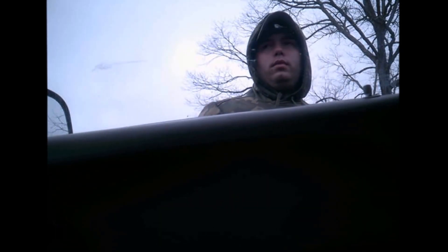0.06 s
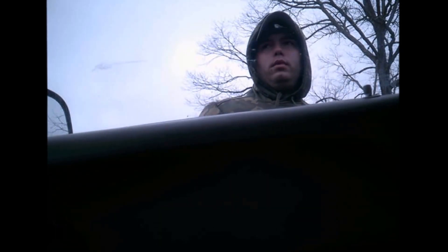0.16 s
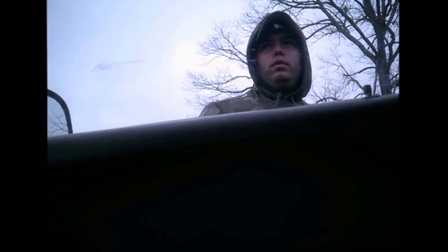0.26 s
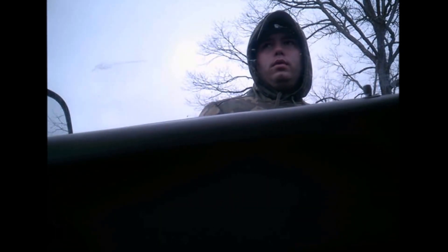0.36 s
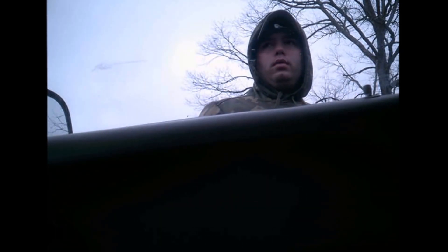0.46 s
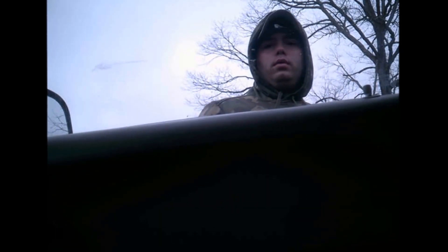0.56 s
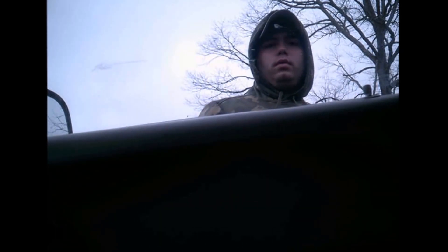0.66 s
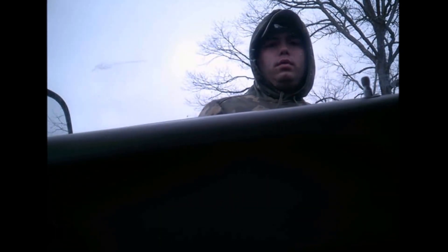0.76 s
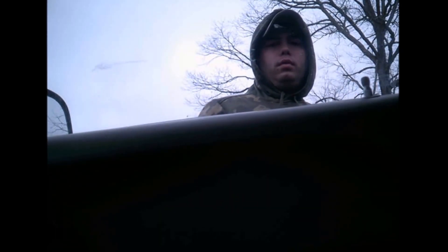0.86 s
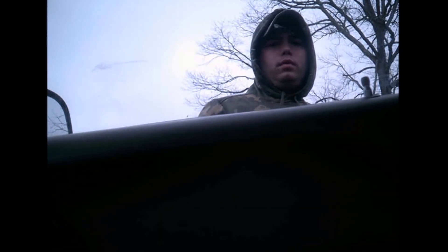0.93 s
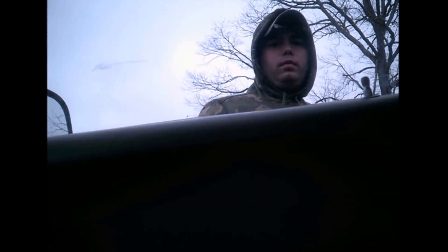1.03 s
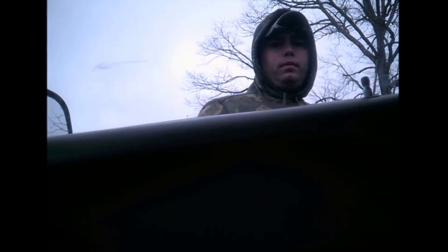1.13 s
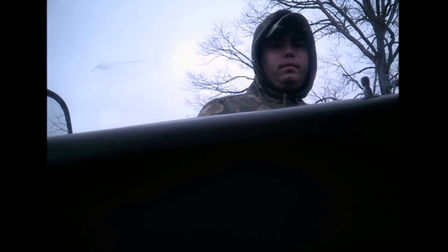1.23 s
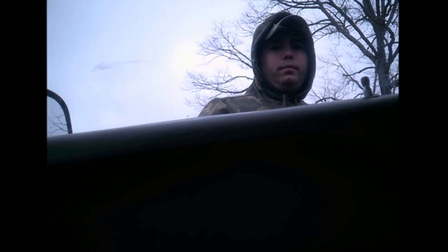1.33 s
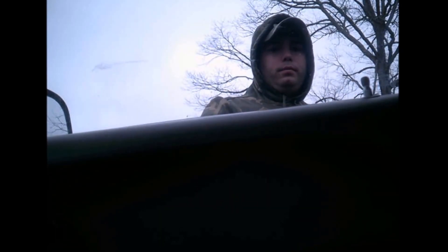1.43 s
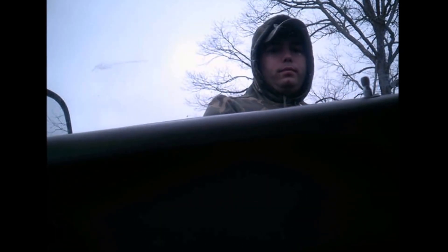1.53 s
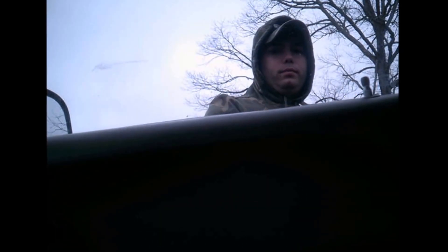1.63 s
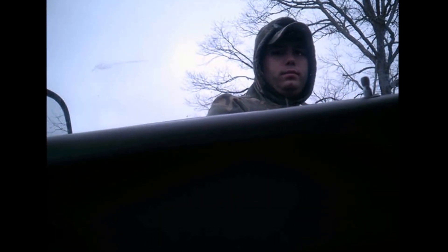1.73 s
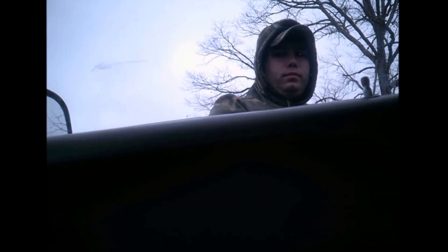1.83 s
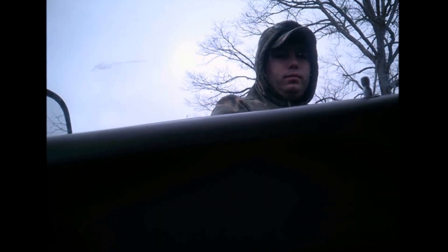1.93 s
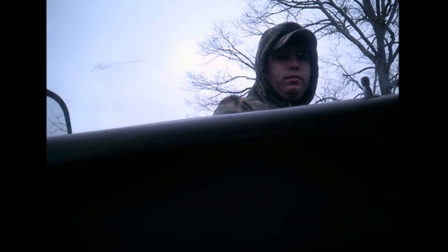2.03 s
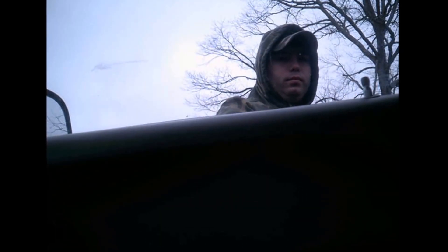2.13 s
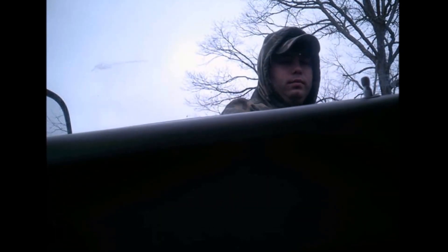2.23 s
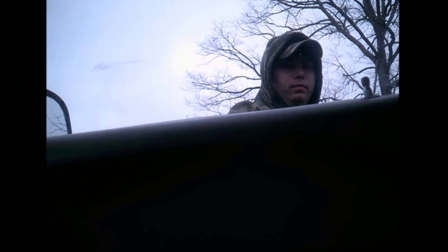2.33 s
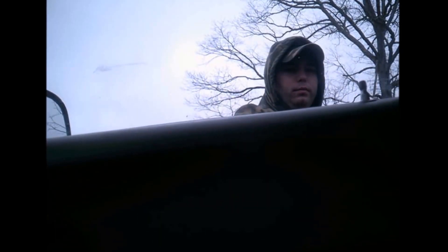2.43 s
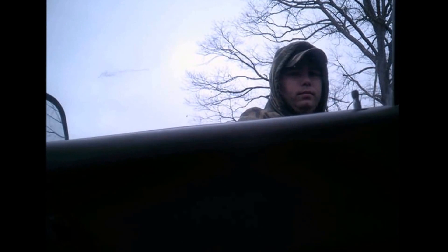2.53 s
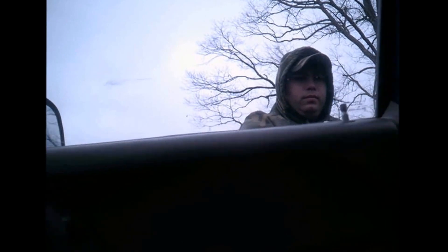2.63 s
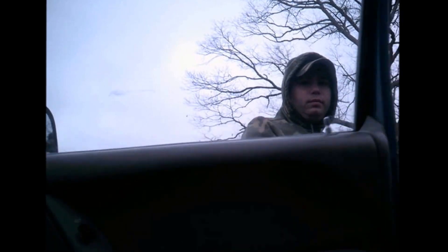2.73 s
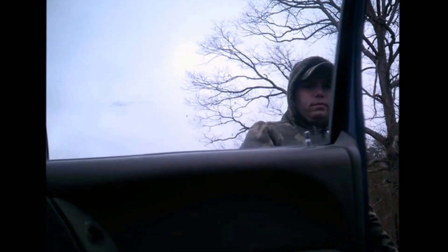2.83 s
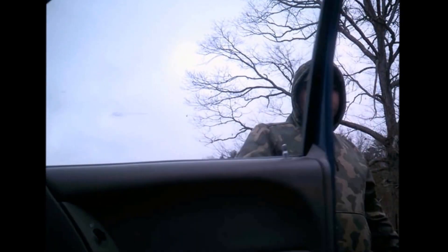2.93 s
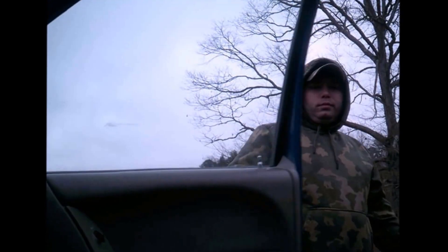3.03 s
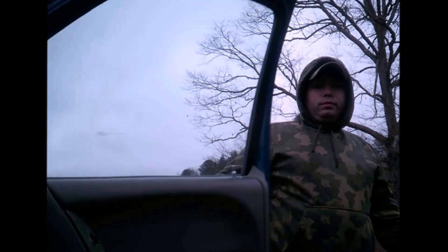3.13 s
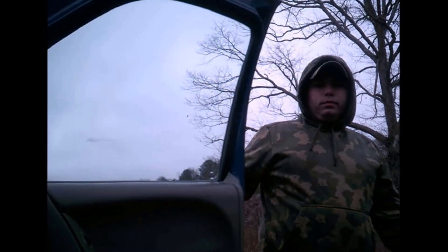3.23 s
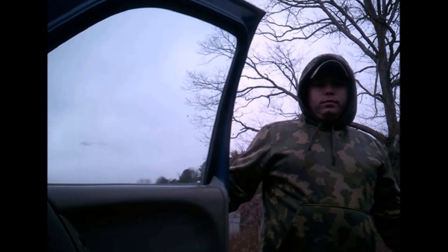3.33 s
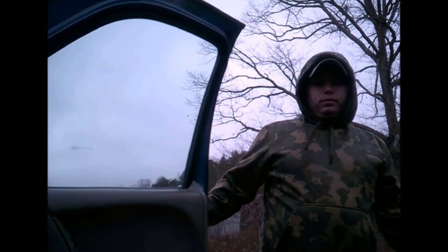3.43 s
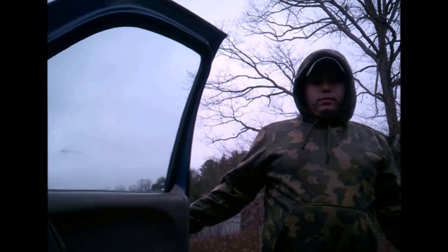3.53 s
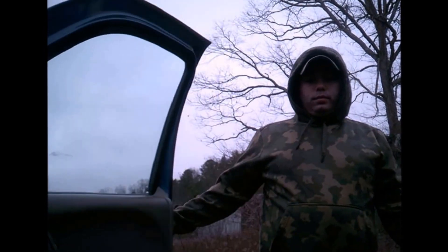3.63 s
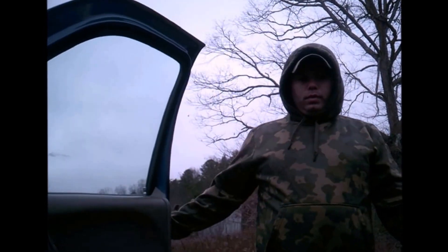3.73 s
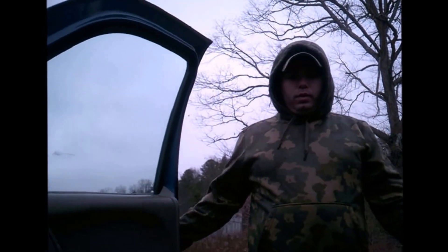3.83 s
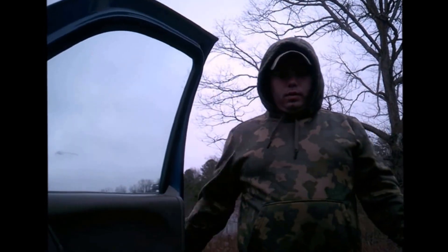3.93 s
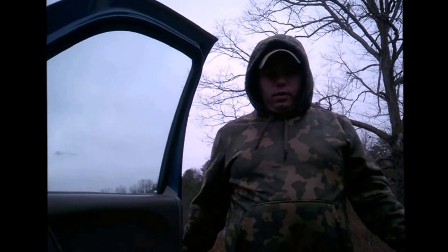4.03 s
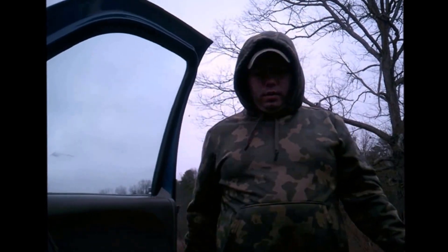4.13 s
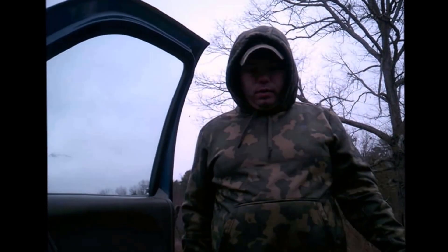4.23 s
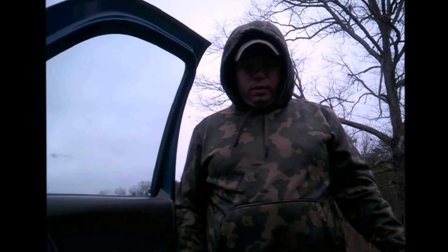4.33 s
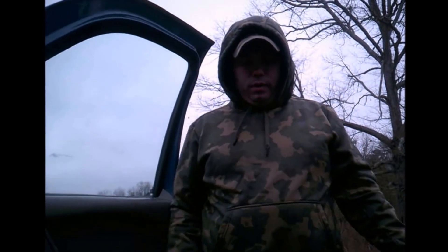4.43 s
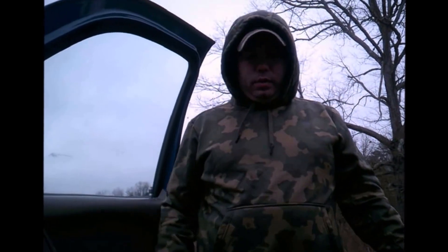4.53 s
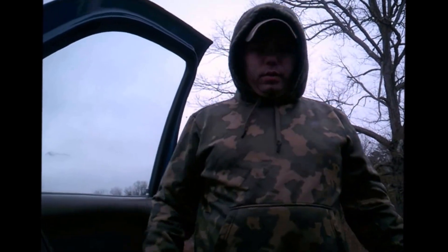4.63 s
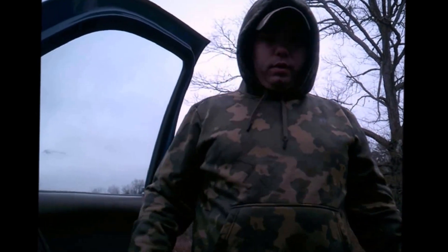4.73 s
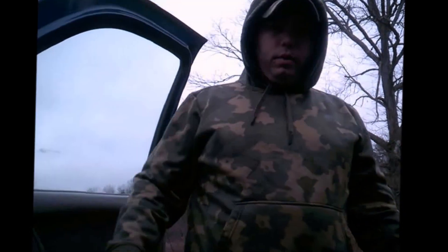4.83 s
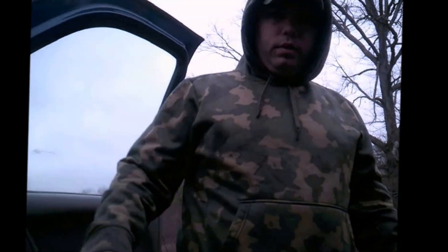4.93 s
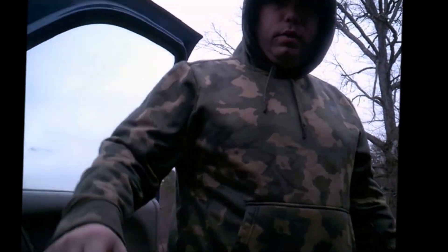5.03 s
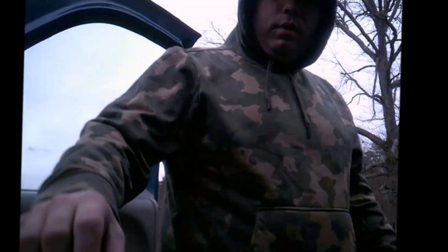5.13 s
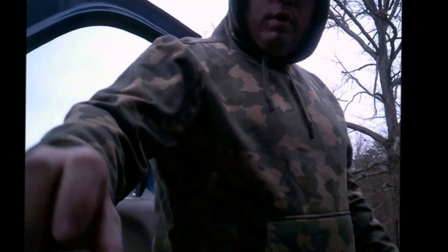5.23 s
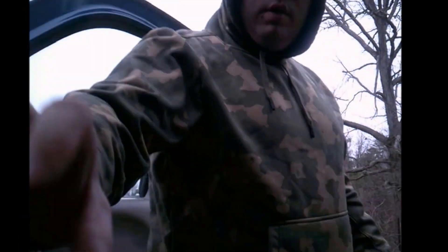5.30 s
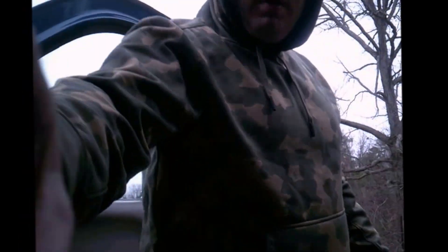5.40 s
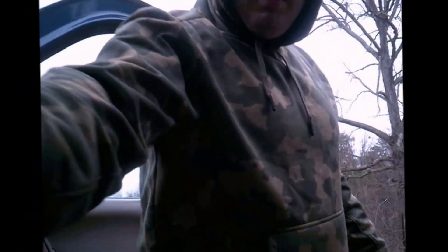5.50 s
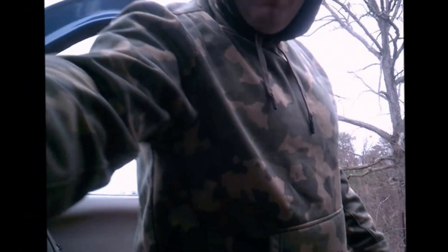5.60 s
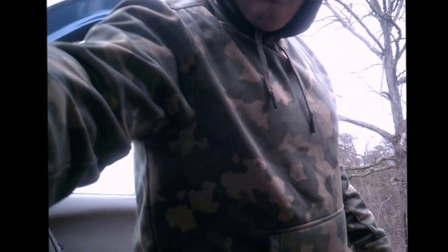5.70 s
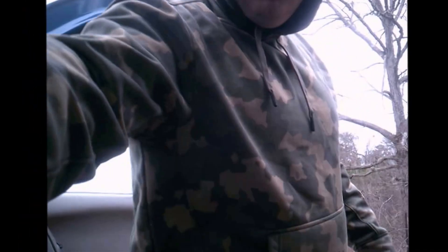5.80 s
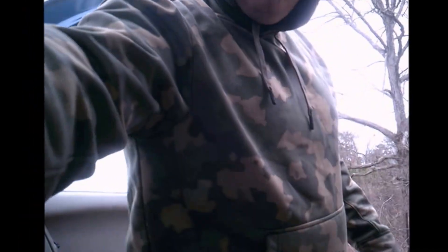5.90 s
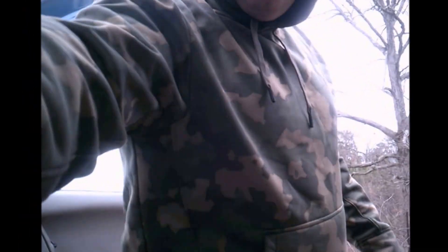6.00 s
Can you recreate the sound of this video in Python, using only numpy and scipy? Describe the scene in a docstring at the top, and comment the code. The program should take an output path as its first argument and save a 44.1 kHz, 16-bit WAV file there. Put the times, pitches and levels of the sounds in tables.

```python
"""Car door opened from outside

A phone inside a parked car hears the door handle pulled: clicks, thuds and rubbing ring families of door modes,
with short pings, a plastic squeak and falling panel tones among them. The seal lets go and the cab pressure
swings so far that the microphone sits at its limits, then the door shudders open.
Shaped noise makes the low wind rumble and outdoor hiss, narrow noise the faint hum; a faint high whine joins late."""
import sys
import numpy as np
from scipy import signal
from scipy.fft import rfft, irfft
from scipy.io import wavfile
from scipy.ndimage import uniform_filter1d

SR = 44100
rng = np.random.default_rng(int(sys.argv[2]) if len(sys.argv) > 2 else 0)


def wav_out(sig):
    """Save sig, one row per channel (or a flat mono array), as 16-bit PCM at SR to the path in sys.argv[1]."""
    wavfile.write(sys.argv[1], SR, np.round(np.clip(np.atleast_2d(sig).T, -1, 1) * 32767).astype(np.int16))


N = 267246
T = np.arange(N) / SR  # time [s]

# Noise spectra, relative until scaled to rms 1: (frequency [Hz], density [dB per Hz])
WIND_SPECTRUM = [(1.8, -31), (3.0, -1), (19, 0), (31, -3), (54, -14), (80, -11), (100, -41), (180, -120)]
HISS_SPECTRUM = [(35, -3), (60, 1.5), (125, -0.5), (188, -11), (205, -26), (236, -9.5), (261, -15),
                 (592, -20), (967, -25), (1400, -26), (3040, -35.5), (3360, -39), (4860, -58.5),
                 (7170, -38.5), (7940, -46), (10300, -85.5), (17500, -120)]
CIRCUIT_SPECTRUM = [(20, 16.0), (1000, -5.0), (3000, -20.5), (8000, -25.5)]
# Hum lines: (frequency [Hz], level [dB])
HUM_LINES = [(118.4, -60), (177.6, -66.5), (236, -65)]
# Lift of the middle of the hiss, 2.5 dB from the start and rising further as the door opens: (time [s], lift
# [dB])
OUTDOOR_LIFT = [(2.4, 2.5), (3, 3.5)]

# Short squeaks and pings: (time [s], pitch [Hz], level [dB], length [s], pitch wobble [share])
PING_EVENTS = [(1.364, 609.3, -43, 0.0515, 0.052), (1.475, 589.7, -50, 0.03, 0.034),
               (2.288, 97.52, -35, 0.079, 0.025), (4.422, 3210, -60, 0.0093, 0.018),
               (3.849, 3180, -62.5, 0.0074, .02), (4.562, 238.2, -45, 0.0097, 0.048)]
# Partials of the plastic squeak: (multiple of the pitch [1], level above the squeak level [dB])
SQUEAK_PARTIALS = [(1, 3), (2, 5.5), (3, 5), (4, -10), (5, -4.5), (6, -4.5), (7, -30.5), (8, -10.5),
                   (9, -28.5)]
# Short falling "pews" of the panel: (time [s], level [dB])
PANEL_DROPS = [(.9645, -33.5), (1.7065, -43), (1.954, -35.5), (2.599, -48.5)]

# Families of door modes, low to high: (frequency [Hz], relative level [dB], 60 dB decay time [s])
BOOM_MODES = [(37, 0, .3), (50, 5, .38), (60, 2, .25), (84, -3, .12), (115, -1.5, .12)]
BODY_MODES = [(137.84, 0, 0.12), (204, -5, 0.08), (264.05, -3.5, 0.083), (322.45, -6, 0.12),
              (390.4, -6.5, 0.12)]
PANEL_MODES = [(470.1, -5, 0.052), (496.7, -12, 0.084), (550.6, -2.5, 0.044), (611.4, -1, 0.068),
               (704.2, -4, 0.062), (774.1, -7.5, 0.056), (882, -9, 0.018)]
LATCH_MODES = [(1034, -7, 0.045), (1234.5, -7, 0.045), (1329, -7, 0.06), (1480.4, -2.5, 0.045),
               (1589.7, -2, 0.058), (1651.5, -5.5, 0.031), (1922.6, -13.5, 0.06)]
CRACK_MODES = [(2158, -10, 0.027), (2420, -8, 0.022), (2586, -2.5, 0.035), (3320, -5, 0.013),
               (3570, -9.5, 0.0091), (3990, -15.5, 0.011), (5680, -20, 0.02), (6367, -15.5, 0.014),
               (7390, -21, 0.01)]
FAMILIES = (BOOM_MODES, BODY_MODES, PANEL_MODES, LATCH_MODES, CRACK_MODES)
# Handle, hinges, seal and cloth rubbing:
# (time [s], panel level [dB], added to the latch share [dB], added to the crack share [dB])
RUBBING = [(.72, -100.5, 0.5, 5.5), (.76, -41, 8, 1.5), (.8, -41.5, 3.5, -7.5), (.95, -65, -1, 0.5),
           (1.2, -71, 5.5, 2.5), (1.33, -64.5, -6.5, -7), (1.42, -64.5, -5, -1.5), (1.52, -68, -3, -2),
           (1.6, -87, -3, 1), (2.2, -83, -14, 7.5), (2.28, -62, -6.5, -3), (2.325, -69, -1.5, -4.5),
           (2.36, -56, -4.5, -4.5), (2.8, -65, -2, 1), (2.95, -67, 1.5, -3.5), (3.08, -59, -5, 5),
           (3.2, -66.5, -4.5, 2), (3.35, -85.5, -6.5, 0.5), (3.6, -60.5, -0.5, -4), (3.72, -68, 13, 7),
           (3.85, -70.5, 11.5, 6), (4.0, -80, 3.5, 0.5), (4.3, -72, 7.5, 2), (4.44, -67, 8.5, -2),
           (4.6, -70, 4.5, 2.5), (4.78, -73, 6, 3.5), (4.84, -68.5, 14.5, 0), (5.0, -81.5, 4.5, 2.5),
           (5.13, -72, 9.5, 6.5), (5.25, -71.5, 15.5, 9.5), (5.35, -71.5, 12, 12), (5.6, -78, 9, 11),
           (6.0, -76, 10, 12)]
# Handle and latch clicks; weight, latch and crack are relative to the panel:
# (time [s], panel level [dB], weight [dB], latch [dB], crack [dB], panel rattle [s])
CLICK_EVENTS = [(.738, -42, -13, 6.5, 4, 0.01), (0.743, -31.5, -13.5, -3.5, -6.5, 0.033),
                (0.7947, -24, 7.5, 12.5, -34, 0.00274), (.802, -14, -4, -4, -50.5, 0.0072),
                (0.809, -11, -9.5, -1.5, -19, 0.00572), (.818, -27, -1.5, 2, 0, 0.0165),
                (0.847, -32.5, 10, -7, -28.5, 0.0051), (0.875, -33.5, 11, 0.5, -12, 0.00263),
                (0.953, -37.5, -7.5, 4.5, -26, 0.0044), (0.959, -37.5, -3.5, -2.5, -23, 0.013),
                (.965, -46, -10, -5.5, -5, .005), (1.018, -30, -23.5, -3, -13, 0.00914),
                (1.029, -29.5, -8, -11, -22.5, 0.0091), (1.046, -41.5, -33, -10, -20, 0.019),
                (1.253, -48.5, -3.5, -16.5, -21, 0.03), (1.35, -43.5, -23, -3.5, -13, 0.0213),
                (1.472, -50, -8.5, -3, -26, 0.026), (1.6945, -42.5, 1.5, 3.5, 5, 0.00624),
                (1.702, -43.5, 2, 2.5, -1.5, 0.00795), (1.941, -33.5, -11.5, 1, -10, 0.0059),
                (1.948, -37, -11.5, -6.5, -8.5, 0.011), (2.336, -50, 13.5, 7.5, -13, 0.01),
                (2.347, -37, 7.5, -9, -6, 0.01), (2.359, -45.5, 6.5, 4, 0.5, 0.0064),
                (2.372, -52.5, 1, -7, -2, 0.003), (3.816, -51.5, -7.5, 0, -8, 0.0102),
                (3.845, -51, 6.5, -1, -8.5, 0.00725), (4.385, -60, -4.5, -6, 1.5, 0.01046),
                (4.415, -55.5, 6.5, -3.5, -10, 0.00521), (4.838, -62, -2, 15.5, 6, 0.00834),
                (4.853, -61, -5.5, 13, 9, 0.005)]
# Thuds of the moving door; boom, body and latch are relative to the panel:
# (time [s], panel level [dB], boom [dB], body [dB], latch [dB], rattle [s])
THUD_EVENTS = [(2.354, -30.5, 12.5, 6, -23, 0.01216), (2.368, -39, 1.5, 4.5, -12.5, 0.0064),
               (2.38, -37.5, 7, 12, -14.5, 0.0042), (2.756, -51.5, 11.5, -0.5, -19, 0.0071),
               (2.792, -50, 24.5, -9.5, -5, 0.00418), (2.956, -56, 0.5, 14, -22.5, 0.0093),
               (2.996, -61, -1.5, -2, 1, 0.0089), (3.023, -45, 9.5, 3, -19, 0.0079),
               (3.076, -51.5, 1, -3, -16.5, 0.0109), (3.123, -33, 5, 1, -28.5, 0.00935),
               (3.134, -34, 2.5, 2, -17.5, 0.00353), (3.194, -54.5, 18, 12.5, -9.5, 0.0115),
               (3.257, -58.5, 10, 5, -22.5, 0.0099), (3.503, -44, 7, 0.5, -24.5, 0.0096),
               (3.576, -23, -20.5, -6.5, -20, 0.0048), (3.587, -35.5, -14, -2.5, -26, 0.00949),
               (3.647, -38, 5, 2.5, -27.5, 0.011), (3.66, -47, -5, 9.5, -29, .012),
               (3.675, -44.5, -4.5, 2.5, -17, 0.00818), (3.892, -28, -17.5, -0.5, -25, 0.005),
               (3.904, -41.5, -14.5, 4.5, -32.5, 0.01023), (4.172, -45.5, -1.5, 5, -17, 0.0068),
               (4.552, -47.5, -26, 8, -9.5, 0.0044)]

# Cab pressure as the seal lets go, before rounding and limiting: (time [s], pressure [share of full scale])
SEAL_SURGE = [(2.3928, .02), (2.3945, -1.2), (2.42, -3), (2.4478, -.56), (2.454, 1), (2.52, 3),
              (2.592, .52), (2.599, .22), (2.609, -.7), (2.735, -1.1), (2.754, -.54), (2.768, -.27)]
# Jolts of the door that push or pull the cab air: (time [s], pressure [share of full scale], length [s])
DOOR_JOLTS = [(.795, -.1, .014), (2.347, .08, .02), (2.6455, .46, .024), (2.8, -.18, .03),
              (2.905, .05, .03), (2.935, -.05, .025), (2.96, .06, .04), (3.035, .08, .05), (3.13, .2, .022),
              (3.148, .22, .022), (3.177, -.09, .03), (3.297, .06, .025), (3.326, -.07, .025),
              (3.353, .07, .025), (3.381, -.05, .025), (3.495, .1, .03), (3.525, -.11, .04),
              (3.572, -.06, .025), (3.61, -.05, .02), (3.635, .08, .04), (3.68, .06, .03),
              (3.725, -.05, .04), (3.77, -.08, .07), (3.82, -.04, .02), (3.843, .05, .035)]

WIND_SHUT_DB, WIND_OPEN_DB, OPENS_S = -47, -43.5, 2.8
STIR_DB, STIR_DB_PER_S = -38.5, -3.5  # air stirred by the swing of the door, dying away
DRONE_HZ, DRONE_WIDTH_HZ, DRONE_DB = 88, 5, -57
SWELL_S, SWELL_LENGTH_S, SWELL_DB = 4.2, 0.37, 11.5  # one swell of the drone
HUM_WIDTH_HZ, HISS_DB = 3.2, -52.5

WHINE_FROM_S, WHINE_FADE_S, WHINE_DB = 5.03, .15, -78.5
WHINE_HZ, WHINE_SAG_HZ_PER_S = 3430, 170
WHINE_WAVER, WHINE_BLUR = .005, .014  # slow and quick pitch wobble [share]

SQUEAK_S, SQUEAK_LENGTH_S, SQUEAK_DB = .964, .02, -51
SQUEAK_HZ, SQUEAK_WOBBLE = 427, .005  # pitch, wobble [share]
DROP_HZ, DROP_OCTAVES_PER_S, DROP_LENGTH_S = 716.35, -65, 0.0113

MODE_SCATTER_DB = 2.0  # each blow shares its energy a little differently
STRIKE_DB, STRIKE_S = 2, 0.001224  # first contact of a blow: level above the rattle, decay time
CLICK_RISE_S, CLICK_SNAP_S = 0.00355, 0.0074  # build-up; longest rattle of latch and crack
CLICK_BOOM_DB = -0.5  # boom above the weight
THUD_RISE_S, THUD_CRACK_DB = .0012, -17.5  # build-up; crack above the latch
THUD_TILT_DB = -13  # per octave above 500 Hz: soft blows favour the lower panel modes
RUB_BODY_DB, RUB_LATCH_DB, RUB_CRACK_DB = 3.5, -13.5, -13  # above the panel
RUB_PATCHY_DB = 2.3

SETTLE_S, SETTLE_HZ = .13, 1.9  # the air sloshes back to rest after the surge
SHUDDER_FROM_S, SHUDDER_TO_S, SHUDDER_FADE_S = 2.85, 4.3, 0.518
SHUDDER_DB, SHUDDER_DB_PER_S, SHUDDER_PATCHY_DB = -29, -4.5, 2.3
SHUDDER_HZ, SHUDDER_WOBBLE = 18, .15  # rate, wobble [share]

LIMIT, CIRCUIT_DB, TOP_HZ = .5, -73, 8020  # input limit [share of full scale], circuit noise, top cut


def undb(db):
    """dB to gain."""
    return 10 ** (np.asarray(db) / 20)


def unit(x):
    """Scaled to rms 1."""
    return x / np.sqrt(np.mean(x ** 2))


def curve(rows):
    """Each column joined by straight lines in time."""
    times, *columns = np.transpose(rows)
    return [np.interp(T, times, column) for column in columns]


def bell(s, length):
    """Swells and fades around its moment; length spans the two points at 1/e."""
    return np.exp(-((T - s) / (length / 2)) ** 2)


def ramp(s, fade):
    """0 before s, 1 from s + fade on."""
    return np.clip((T - s) / max(fade, .001), 0, 1)


def walk(rate):
    """Random levels held for 1 / rate s and slewed twice; spread near 1."""
    hold = int(SR / rate)
    steps = np.repeat(rng.standard_normal(N // hold + 1), hold)
    return 1.3 * uniform_filter1d(uniform_filter1d(steps, hold), hold)[:N]


def turning(hz):
    """Phase in radians of a tone whose pitch follows hz."""
    return 2 * np.pi * np.cumsum(hz) / SR


def band(hz, width):
    """Noise in one resonance, rms 1."""
    return unit(signal.lfilter(*signal.iirpeak(hz, hz / width, fs=SR), rng.standard_normal(N)))


def coloured(spectrum):
    """Noise with the given spectrum, rms 1."""
    hz, db = np.transpose(spectrum)
    log_hz = np.log(np.fft.rfftfreq(N, 1 / SR) + 0.41)  # the offset avoids log of zero
    shape = undb(np.interp(log_hz, np.log(hz), db))
    return unit(irfft(rfft(rng.standard_normal(N)) * shape, N))


def air():
    """Wind rumble, a wavering drone, hum lines and hiss; wind and outdoor hiss rise as the door opens."""
    opened = ramp(OPENS_S, 0.12)
    steady_wind = undb(WIND_SHUT_DB + (WIND_OPEN_DB - WIND_SHUT_DB) * opened)
    stirred = opened * undb(STIR_DB + STIR_DB_PER_S * (T - OPENS_S))
    rumble = np.hypot(steady_wind, stirred) * undb(2 * walk(30)) * coloured(WIND_SPECTRUM)
    drone_db = DRONE_DB + SWELL_DB * bell(SWELL_S, SWELL_LENGTH_S) + 1.2 * walk(0.97)
    drone = undb(drone_db) * band(DRONE_HZ, DRONE_WIDTH_HZ)
    hum = sum(undb(db) * band(hz, HUM_WIDTH_HZ) for hz, db in HUM_LINES)
    hiss = coloured(HISS_SPECTRUM)
    # the middle of the hiss stands a little higher, more so once the door opens; the phone's own treble noise
    # stays
    outdoor = signal.sosfilt(signal.butter(1, (500, 3500), "band", fs=SR, output="sos"), hiss)
    lift = undb(curve(OUTDOOR_LIFT)[0]) - 1
    return rumble + drone + hum + undb(HISS_DB) * (hiss + lift * outdoor)


def whine():
    """A faint high tone, blurred by quick pitch wobble, that sinks a little."""
    hz = WHINE_HZ - WHINE_SAG_HZ_PER_S * (T - WHINE_FROM_S)
    wobble = WHINE_WAVER * walk(11) + WHINE_BLUR * walk(150)
    level = ramp(WHINE_FROM_S, WHINE_FADE_S) * undb(WHINE_DB + 0.92 * walk(13))
    return level * np.sin(turning(hz * (1 + wobble)))


def pings():
    """Brief tones; much wobble turns a ping into a scrape."""
    drift = np.cumsum(walk(400)) / SR
    out = 0
    for s, hz, db, length, wobble in PING_EVENTS:
        warped_time = T + wobble * (drift - drift[int(s * SR)])
        out = out + undb(db) * bell(s, length) * np.sin(2 * np.pi * hz * warped_time)
    return out


def squeak():
    """Plastic slips at a nearly steady rate for a moment: a stack of partials, the high ones peaking first."""
    phase = turning(SQUEAK_HZ * (1 + SQUEAK_WOBBLE * walk(200)))
    out = 0
    for multiple, db in SQUEAK_PARTIALS:
        swell = bell(SQUEAK_S - .0006 * multiple, SQUEAK_LENGTH_S * (1 + .04 * multiple))
        partial = np.sin(round(multiple) * phase + rng.uniform(0, 2 * np.pi))
        out = out + undb(SQUEAK_DB + db) * swell * partial
    return out


def drops():
    """A bending wave in the panel arrives treble first, so its pitch falls."""
    rate = DROP_OCTAVES_PER_S * np.log(2)
    out = 0
    for s, db in PANEL_DROPS:
        near = np.clip(T - s, -.03, .03)  # keeps the glide within the audible moment
        phase = 2 * np.pi * DROP_HZ * np.exp(rate * near) / rate
        out = out + undb(db) * bell(s, DROP_LENGTH_S) * np.sin(phase)
    return out


def ring(modes, force):
    """Each mode is shaken by its own rough copy of the contact force; a family radiates little above its top mode."""
    out = 0
    for hz, db, t60 in modes:
        radius = np.exp(-np.log(1000) / (t60 * SR))
        w = 2 * np.pi * hz / SR
        rough_force = force * np.sign(rng.standard_normal(len(force)))
        gain = undb(db + MODE_SCATTER_DB * rng.standard_normal())
        resonator = [1, -2 * radius * np.cos(w), radius * radius]
        out = out + gain * unit(signal.lfilter([1], resonator, rough_force))
    out = signal.sosfilt(signal.butter(4, 1.2 * modes[-1][0], fs=SR, output="sos"), out)
    # the family takes up the whole energy of the contact
    mode_power = np.sum(undb(np.array(modes)[:, 1]) ** 2) / 2
    return unit(out) * np.sqrt(np.mean(force ** 2) * mode_power)


def blow(modes, s, db, rise, length):
    """A short rattle, strongest at first contact, rings one family of modes as they die away."""
    seconds = min(1, 8 * length + max(t60 for _, _, t60 in modes))
    u = T[:int(SR * seconds)]
    build_up = 1 - np.exp(-u / max(rise, .0003))
    rattle = np.exp(-u / max(length, .001))
    strike = undb(STRIKE_DB) * np.exp(-u / max(STRIKE_S, .0003))
    out = np.zeros(N + SR)
    start = int(s * SR)
    out[start:start + len(u)] = undb(db) * ring(modes, build_up * (rattle + strike))
    return out[:N]


def clicks():
    """Handle and latch parts strike the door; latch and crack get a shorter rattle where the panel's is long."""
    out = 0
    for s, db, weight_db, latch_db, crack_db, rattle in CLICK_EVENTS:
        snap = min(CLICK_SNAP_S, rattle)
        shares = weight_db + CLICK_BOOM_DB, weight_db, 0, latch_db, crack_db
        lengths = rattle, rattle, rattle, snap, snap
        for modes, share_db, length in zip(FAMILIES, shares, lengths):
            out = out + blow(modes, s, db + share_db, CLICK_RISE_S, length)
    return out


def thuds():
    """Softer blows of the moving door, which favour the lower panel modes."""
    dull_panel = [(hz, db + THUD_TILT_DB * np.log2(hz / 500.0), t60) for hz, db, t60 in PANEL_MODES]
    families = BOOM_MODES, BODY_MODES, dull_panel, LATCH_MODES, CRACK_MODES
    out = 0
    for s, db, boom_db, body_db, latch_db, rattle in THUD_EVENTS:
        shares = boom_db, body_db, 0, latch_db, latch_db + THUD_CRACK_DB
        for modes, share_db in zip(families, shares):
            out = out + blow(modes, s, db + share_db, THUD_RISE_S, rattle)
    return out


def rubbing():
    """A patchy, continuous friction force drives every family but the boom."""
    rub_db, latch_db, crack_db = curve(RUBBING)
    friction = undb(rub_db + RUB_PATCHY_DB * walk(30))
    shares = RUB_BODY_DB, 0, RUB_LATCH_DB + latch_db, RUB_CRACK_DB + crack_db
    return sum(ring(modes, undb(share_db) * friction) for modes, share_db in zip(FAMILIES[1:], shares))


def door():
    """Clicks, thuds and rubbing all ring the same families of door modes."""
    return clicks() + thuds() + rubbing()


def seal_surge():
    """The seal lets go: pressure swings, rounded by the air's inertia, then sloshes back to rest."""
    after = np.maximum(T - SEAL_SURGE[-1][0], 0)
    settling = np.exp(-after / SETTLE_S) * np.cos(2 * np.pi * SETTLE_HZ * after)
    surge = curve(SEAL_SURGE)[0] * (T > SEAL_SURGE[0][0]) * settling
    # slow swings are rounder than the break of the seal
    soft = uniform_filter1d(uniform_filter1d(surge, size=300), size=300)
    return np.where(T > 2.62, soft, uniform_filter1d(surge, size=18))


def shudder():
    """The swinging door pumps the cab air at a low, wobbling rate, dying away."""
    phase = turning(SHUDDER_HZ * (1 + SHUDDER_WOBBLE * walk(9.4)))
    swinging = ramp(SHUDDER_FROM_S, SHUDDER_FADE_S) - ramp(SHUDDER_TO_S, SHUDDER_FADE_S)
    level_db = SHUDDER_DB + SHUDDER_DB_PER_S * (T - SHUDDER_FROM_S) + SHUDDER_PATCHY_DB * walk(12.0)
    return swinging * undb(level_db) * np.sin(phase)


def cab_pressure():
    """The surge of the seal, the jolts and the shudder of the door add up in the cab air."""
    jolts = sum(share * bell(s, length) for s, share, length in DOOR_JOLTS)
    return seal_surge() + jolts + shudder()


def scene():
    """All sources at the phone, one channel."""
    background = air() + whine()
    details = pings() + squeak() + drops()
    return (background + details + door() + cab_pressure())[None, :]


def record(dry):
    """The phone's input stops flat at its limits, later circuits add a faint noise; the top is cut."""
    limited = np.clip(dry, -LIMIT, LIMIT)
    noisy = limited + undb(CIRCUIT_DB) * coloured(CIRCUIT_SPECTRUM)
    return signal.sosfilt(signal.ellip(14, .1, 80, TOP_HZ, fs=SR, output="sos"), noisy)


dry = scene()
out = record(dry)
wav_out(out)
```